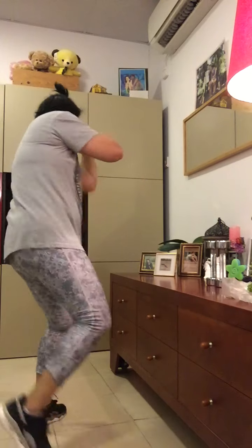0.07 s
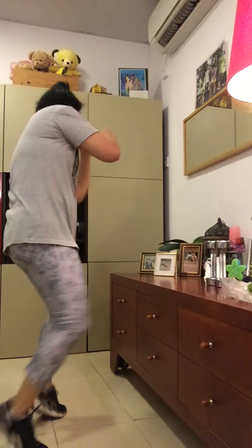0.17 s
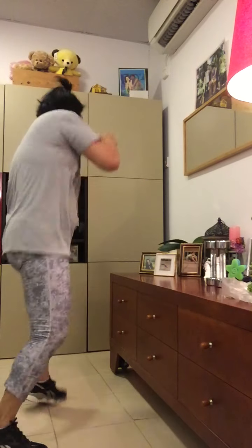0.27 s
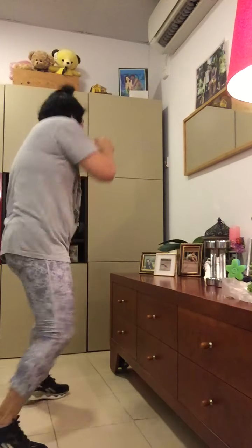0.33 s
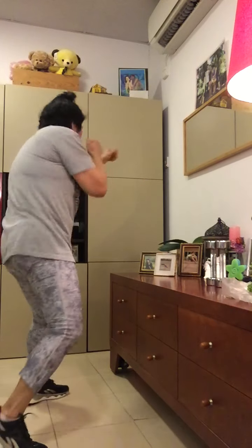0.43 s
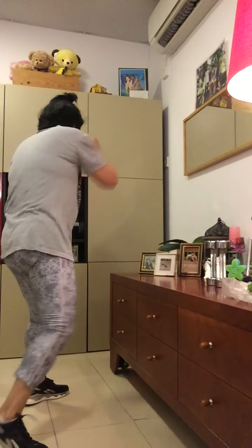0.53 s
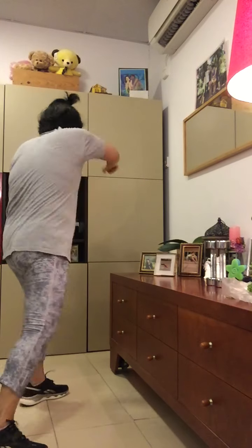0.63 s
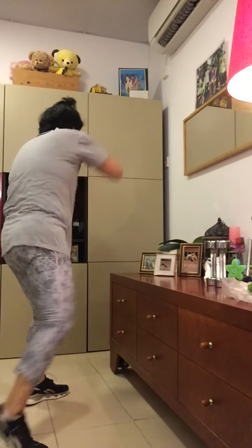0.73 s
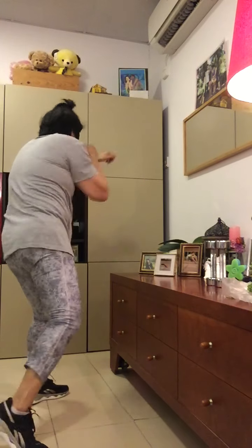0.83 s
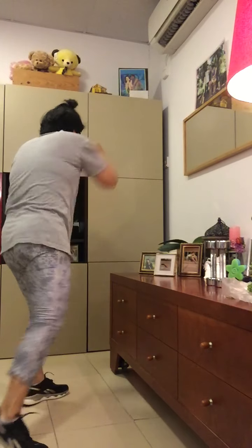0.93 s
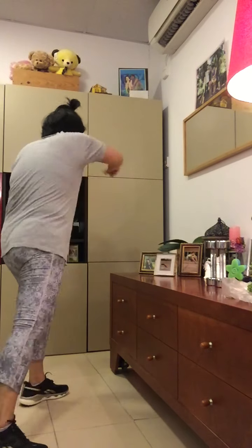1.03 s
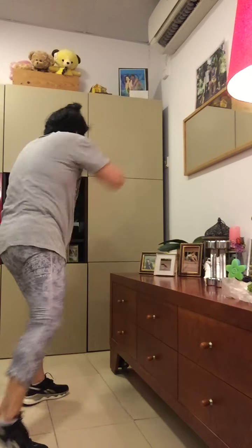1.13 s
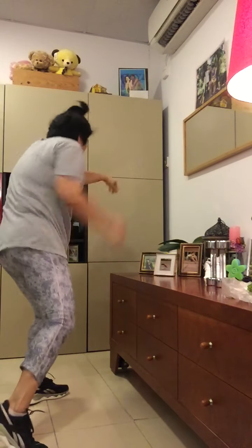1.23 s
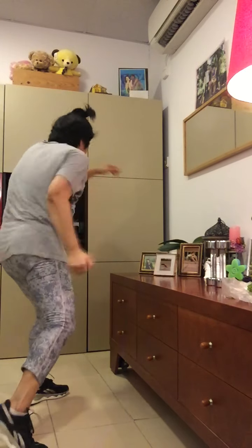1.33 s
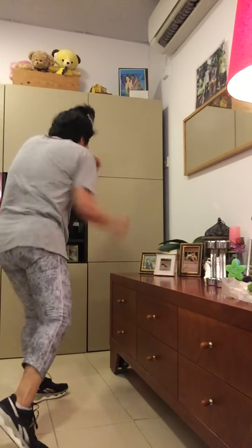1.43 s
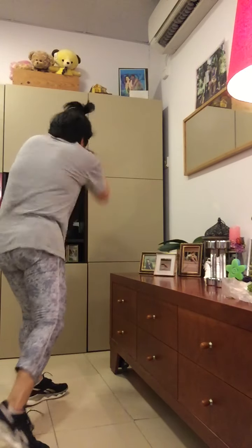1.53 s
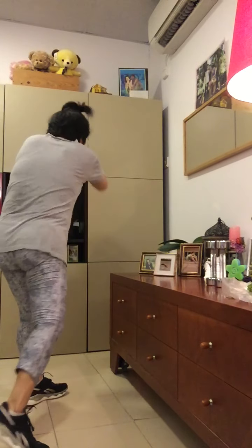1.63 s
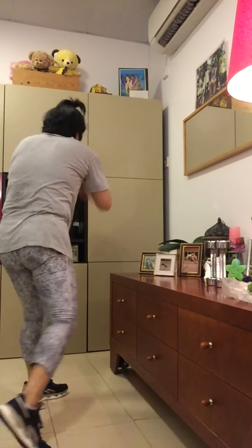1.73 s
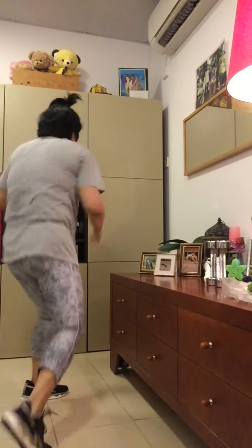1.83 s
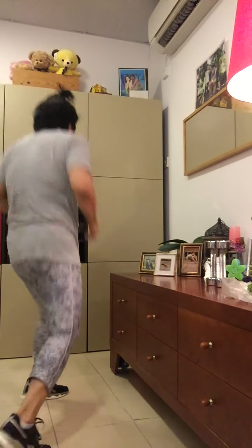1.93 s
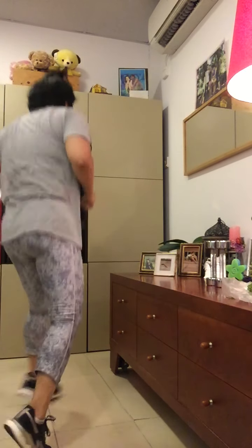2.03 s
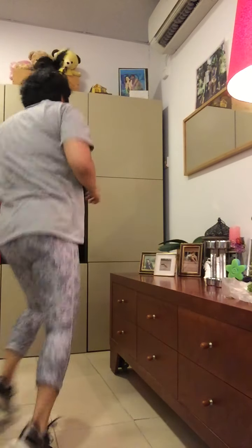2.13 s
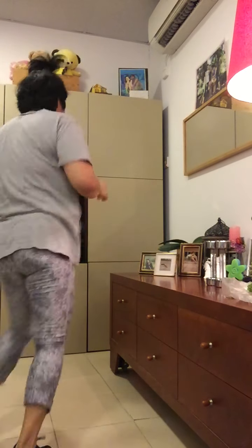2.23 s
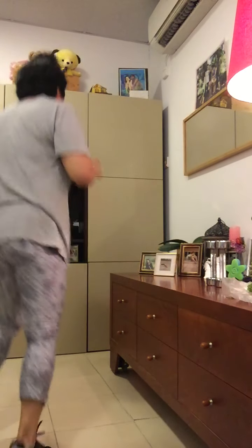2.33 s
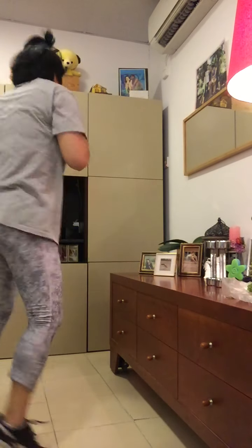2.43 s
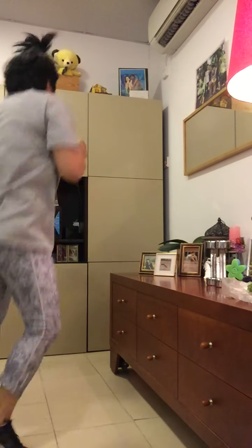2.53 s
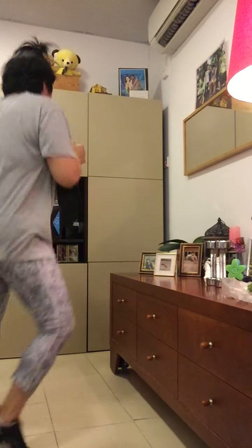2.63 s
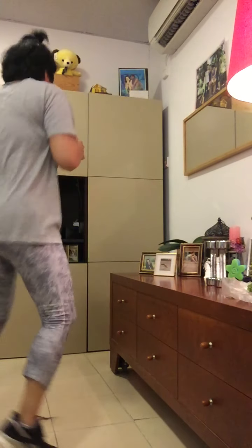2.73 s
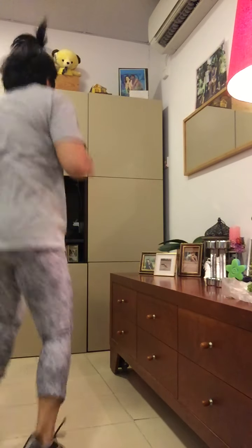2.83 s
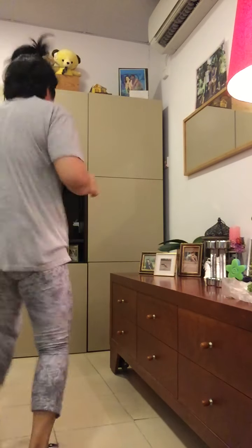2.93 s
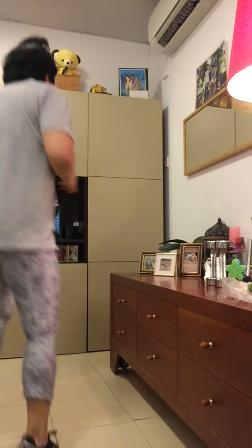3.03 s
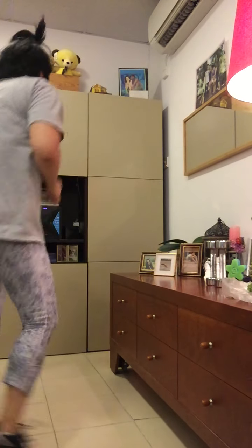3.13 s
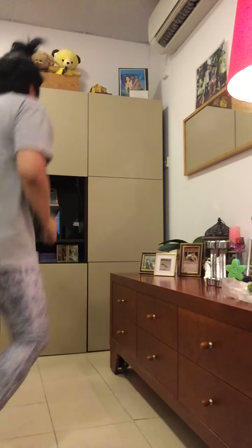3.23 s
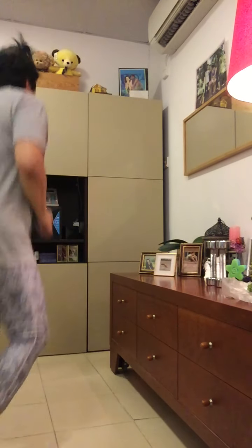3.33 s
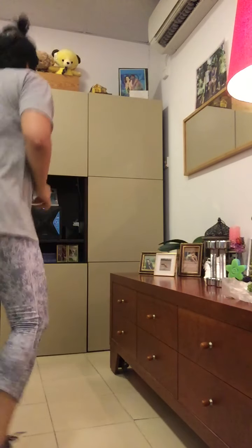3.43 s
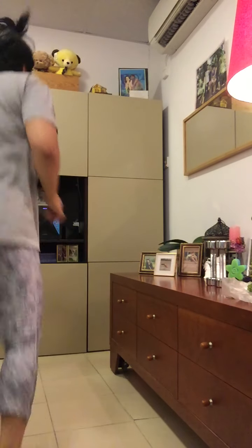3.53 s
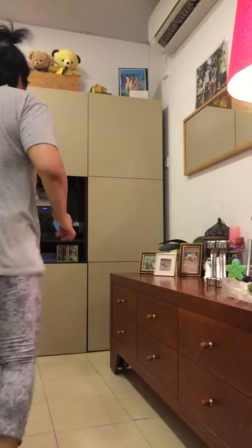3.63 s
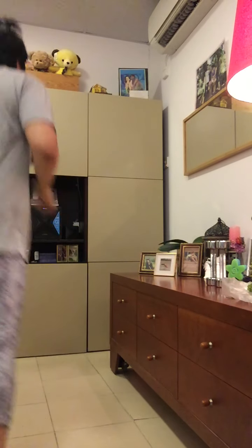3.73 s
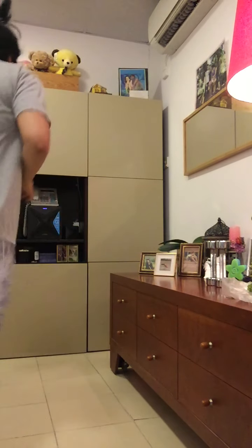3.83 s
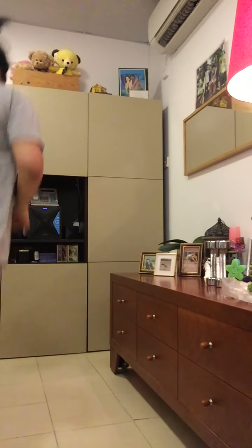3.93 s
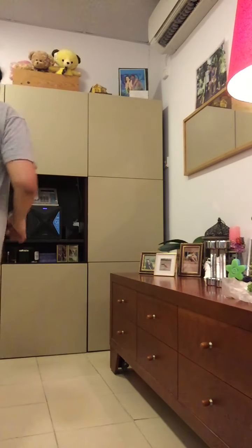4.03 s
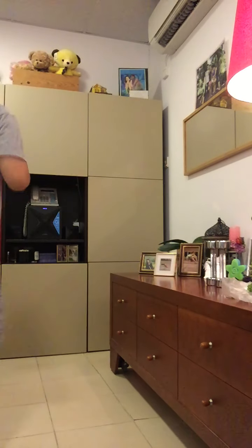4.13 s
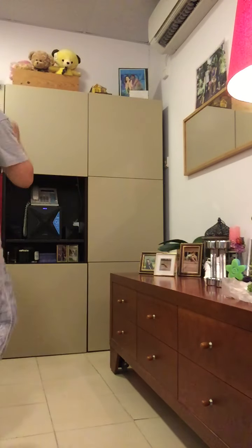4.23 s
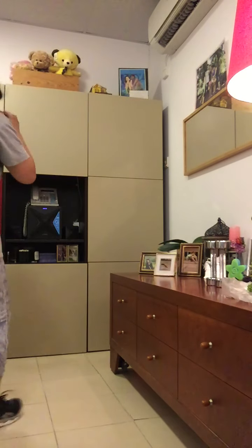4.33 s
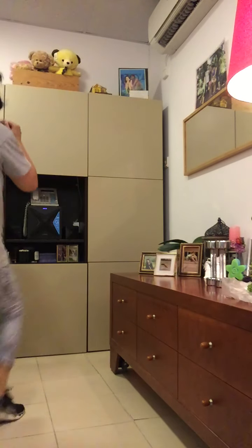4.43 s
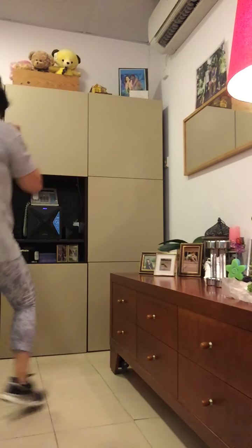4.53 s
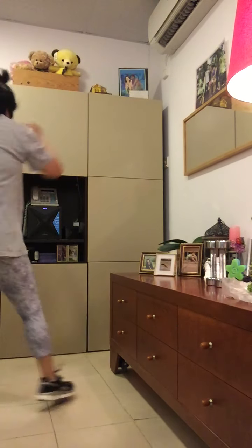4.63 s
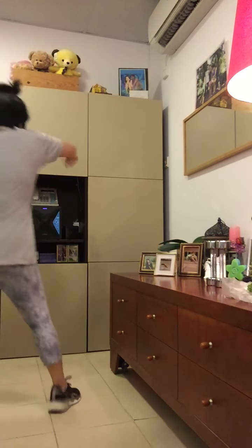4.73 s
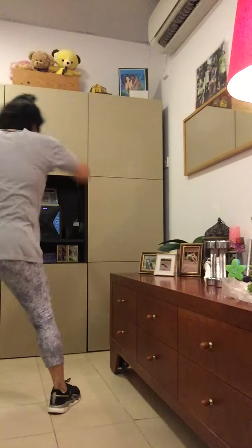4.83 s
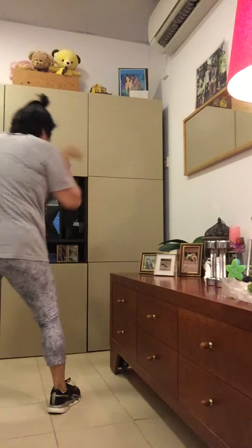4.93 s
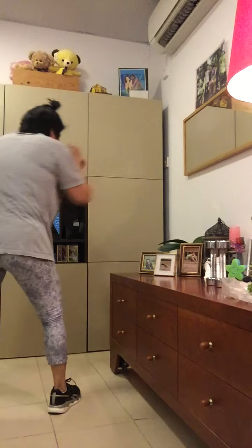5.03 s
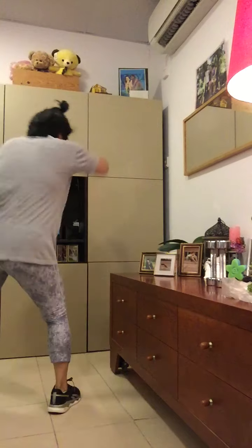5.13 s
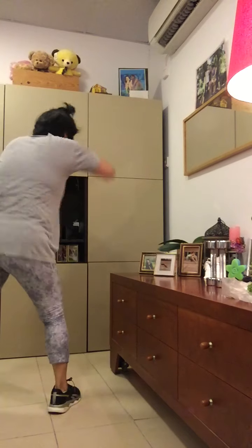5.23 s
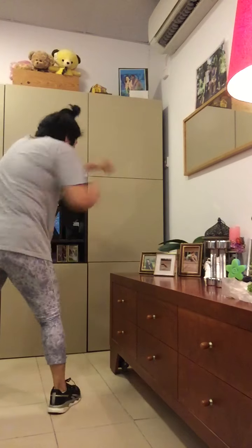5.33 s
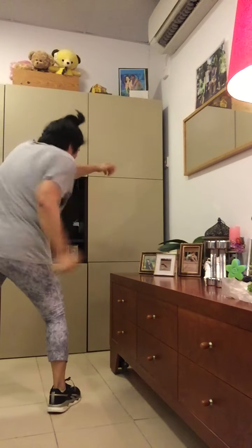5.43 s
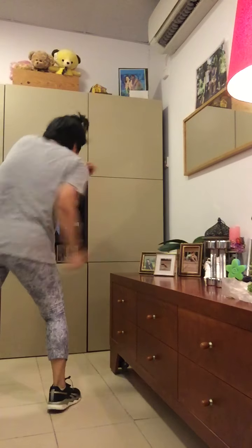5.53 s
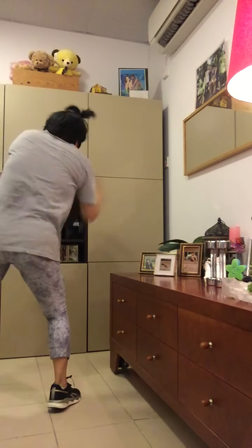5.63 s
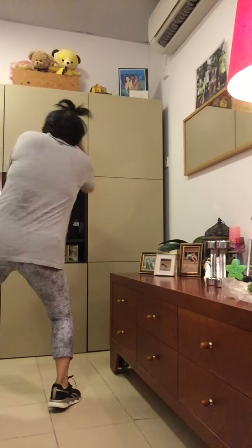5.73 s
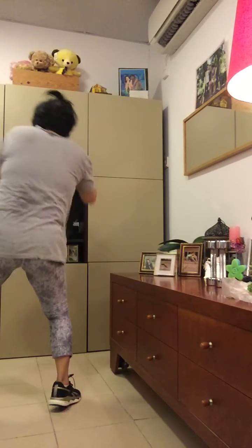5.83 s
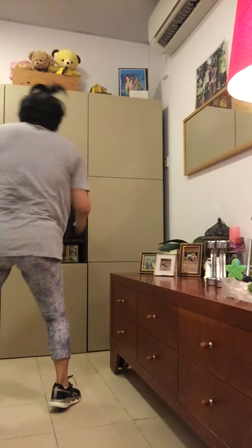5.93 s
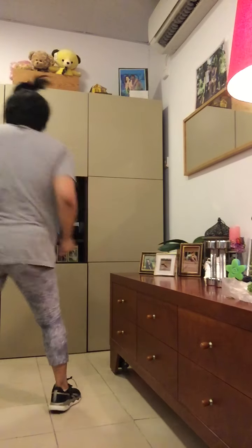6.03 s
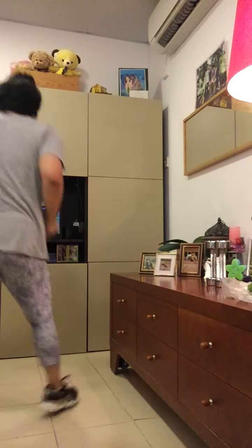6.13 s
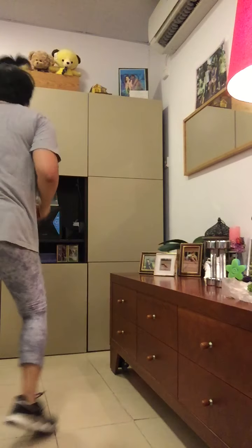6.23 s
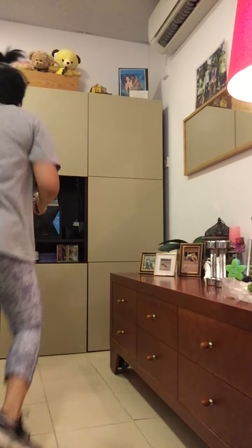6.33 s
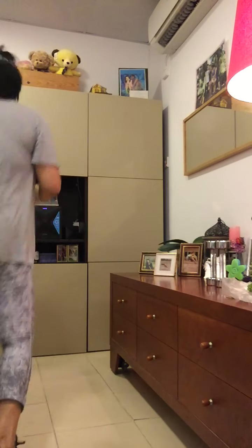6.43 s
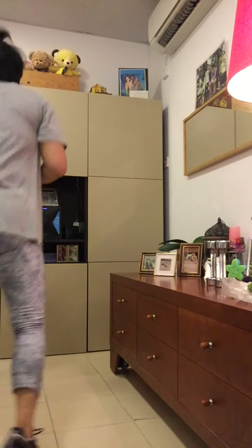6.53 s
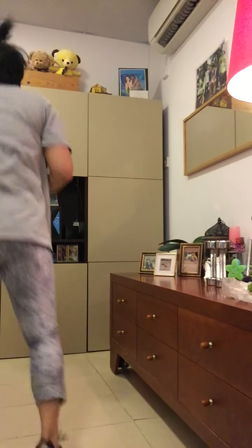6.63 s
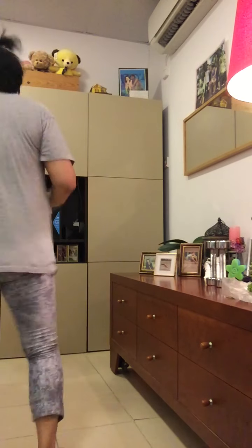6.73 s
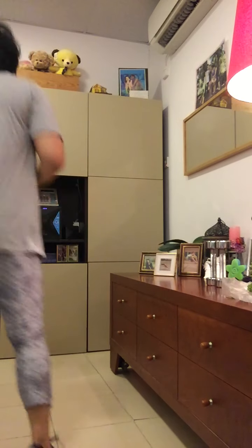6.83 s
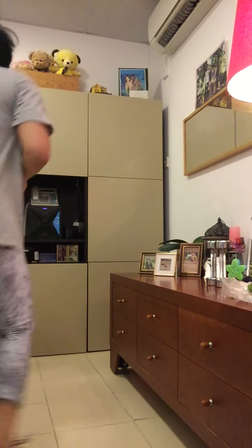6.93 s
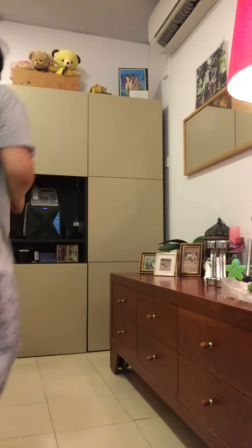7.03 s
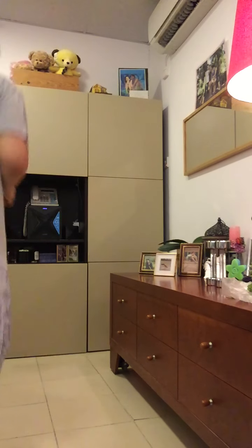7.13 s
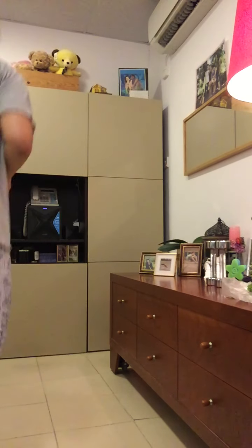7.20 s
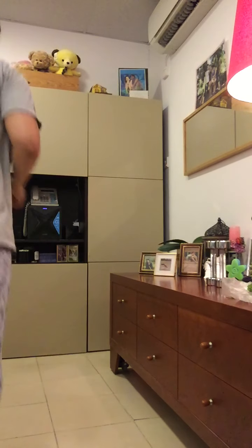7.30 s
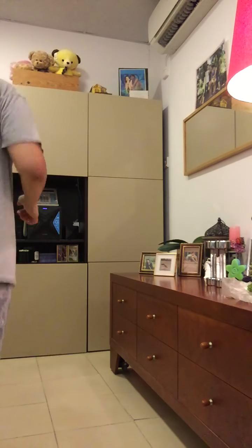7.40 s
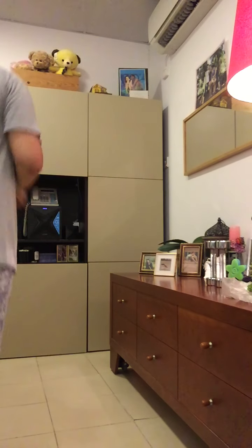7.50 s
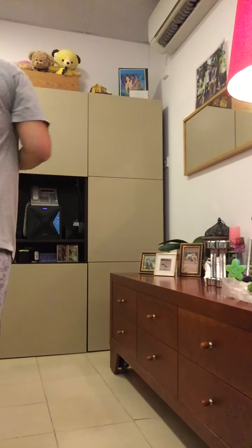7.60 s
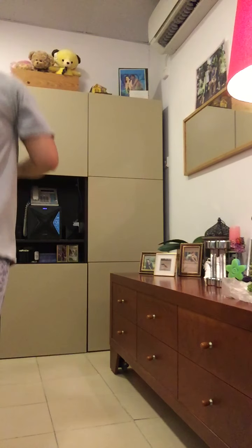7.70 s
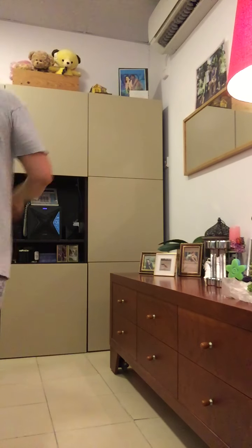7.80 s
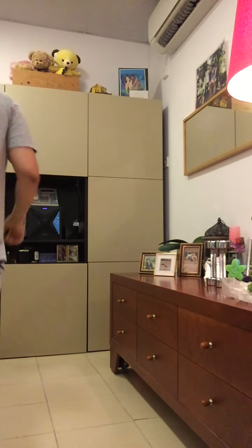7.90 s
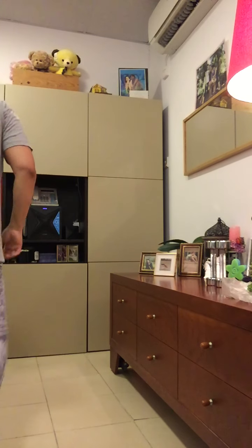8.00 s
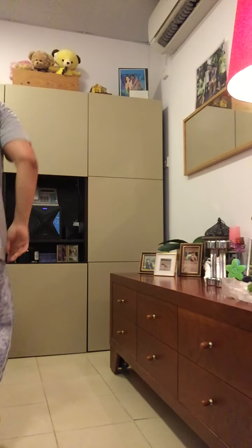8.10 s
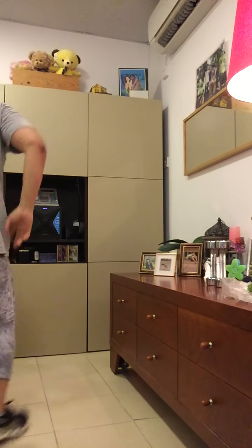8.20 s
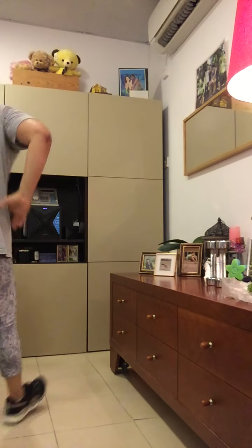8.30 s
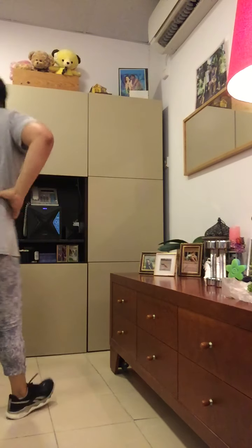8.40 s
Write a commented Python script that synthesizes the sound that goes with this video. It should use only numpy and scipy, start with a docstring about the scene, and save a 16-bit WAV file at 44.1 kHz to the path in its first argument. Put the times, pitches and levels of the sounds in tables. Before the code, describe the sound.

Someone exercises in rubber-soled shoes on hard tiles. Sparse sharp squeaks stand well above soft thuds, slaps, scuffs and tiny lace ticks, each with a short lively room echo. Activity is mostly between two and five seconds and again from six to eight, with low uneven rumble and faint hiss between. Single-channel pickup, moderately close, slight cloth rustle.

```python
"""Running shoes on a tiled floor

Rubber treads chirp by stick-slip oscillation as shoes step and pivot in a small, hard-walled room.
Heels and toes land as damped modes and filtered noise bursts; scuffs and lace ticks are shaped noise.
Clothes rustle faintly as slowly modulated noise, over a low, uneven rumble and a steady faint hiss.
Decaying noise serves as the room's response to the chirps, contacts, scuffs and ticks."""
import sys
import numpy as np
from scipy import signal
from scipy.fft import rfft, irfft, next_fast_len
from scipy.io import wavfile
from scipy.ndimage import uniform_filter1d, map_coordinates

SR = 44100
rng = np.random.default_rng(int(sys.argv[2]) if len(sys.argv) > 2 else 0)


def int16_out(signal):
    """Quantize to a 16-bit WAV file."""
    q = np.round(np.clip(np.atleast_2d(signal).T, -1, 1) * 32767)
    wavfile.write(sys.argv[1], SR, q.astype(np.int16))


N = 373086  # length of the scene in samples
T = np.arange(SR * 2 // 5) / SR  # time axis of one short event, 0.4 s
TOP_HZ = 15830  # upper limit of the audible band

# Noise spectrum of a soft rubbing surface, sole or fabric.
# Each row: frequency in Hz, density in dB per Hz (relative).
RUBBING = [(100, -30.5), (500, -3.5), (1200, 0), (2400, 0.5), (4000, -3), (6000, -11), (9000, -23),
           (16000, -30)]


def squeaks():
    """Stick-slip: a sliding tread sustains an oscillation whose pitch and strength follow its uneven grip."""
    # Tread chirps. Each row: time of full strength in s, sliding time in s, start and end pitch in Hz
    # before roughness, level of the loudest 20 ms in dB, 2nd and 3rd harmonic in dB against the 1st,
    # pitch roughness as a share, scrape in dB and skipped slips in dB.
    chirps = [ (0.036, 0.0056, 3230, 3070, -62, -15, -35, 0.088, -6, -9),
              (0.372, 0.011, 3400, 3240, -40, -39, -53, 0.0205, -36, -28),
              (0.376, 0.012, 4810, 4510, -38, -31, -53, 0.0068, -40, -36),
              (2.485, 0.021, 2522, 2677, -23, 1, -11.5, 0.029, -18.5, -21.5),
              (2.498, 0.017, 3040, 2687, -25, -7, -23.5, 0.036, -15, -16),
              (3.16, 0.0059, 3114, 2960, -39, -23.5, -52, 0.065, -21, -26),
              (3.177, 0.0049, 2780, 2860, -37.5, -21, -45, 0.03, -25, -30),
              (3.501, 0.0022, 3910, 3870, -55, -30, -55, 0.078, -2, -49),
              (3.511, 0.0061, 4300, 3750, -46.5, -41, -60, 0.091, -14, -38),
              (3.844, 0.021, 2610, 2577, -27, -12.5, -23.5, 0.042, -18, -19),
              (3.855, 0.016, 2430, 2330, -33.5, 3, -13.5, 0.028, -25, -26),
              (3.943, 0.026, 5900, 5640, -51, -40, -69, 0.013, -36, -30),
              (4.476, 0.0098, 3004, 3020, -28, 1.5, 7, 0.022, -16.5, -25.5),
              (4.479, 0.025, 3327, 3148, -34, -7.5, -29, 0.037, -18.5, -21.5),
              (6.65, 0.0036, 2730, 2560, -40.5, -18.5, -33, 0.0585, -24, -24),
              (6.9932, 0.0011, 2690, 2900, -39, -17.5, -44, 0.1, -28, -24),
              (7.008, 0.0011, 2904, 3050, -42, -20, -39.5, 0.054, -20.5, -21),
              (7.33, 0.0023, 2746, 2480, -35.5, -17.5, -31, 0.033, -18.5, -13),
              (7.339, 0.006, 2744, 2750, -34.5, -15, -32, 0.035, -27, -20)]
    # 4th and 5th harmonic, each in dB against the 3rd.
    upper_db = [-14, -16]
    # Noise spectrum of a scraping tread. Each row: frequency in Hz, density in dB per Hz (relative).
    scrape_spectrum = [(200, -24), (1400, -7.5), (2200, 3.5), (3500, 7.5), (6000, -2.5), (9000, -16.5),
                       (16000, -22)]
    # louder chirps start more abruptly
    reference_db = -28.5  # chirp level that has the plain onset time
    onset_s, onset_halves_db = 0.0016, 15.5  # onset time; extra level that halves it
    let_go_s = .0013  # decay time once the tread grips
    # faint noise rising into the chirp: level against the full scrape, rise time
    lead_in_db, lead_in_s = -10, 0.014
    flutter_db, rough_flutter_db = 1.8, 25  # unsteady strength: smooth chirp, extra per share of roughness
    before_s = .04  # time kept ahead of full strength
    out = np.zeros(N)
    t = T - before_s
    for s, length, start_hz, end_hz, db, second_db, third_db, rough, scrape_db, skip_db in chirps:
        extra_db = db - reference_db
        rise_s = onset_s * .5 ** (extra_db / onset_halves_db)
        grip = wobble(500, len(T)) + .45 * wobble(1300, len(T))
        pitch = np.interp(t, [0, length], [start_hz, end_hz]) * (1 + rough * grip)
        phase = 2 * np.pi * np.cumsum(pitch) / SR
        levels = [0, second_db, third_db, *(third_db + np.array(upper_db))]
        tone = tread_tone(phase, start_hz, levels, rough)
        # a poor grip scrapes, and makes every other slip weaker: a partial between the first two harmonics
        scrape = amp(scrape_db) * unit(colour(rng.standard_normal(len(T)), scrape_spectrum))
        skips = amp(skip_db) * wobble(700, len(T)) * np.sin(phase + phase / 2)
        # the chirp rises exponentially, holds while the tread slides and stops when it grips
        onset = np.exp(np.minimum(t, 0) / rise_s)
        lead_in = amp(lead_in_db) * np.exp(np.minimum(t, 0) / lead_in_s)
        sliding = np.exp(-np.maximum(t - length, 0) / let_go_s)
        flutter = amp((flutter_db + rough_flutter_db * rough) * wobble(452.5, len(T)))
        source = (unit(tone) + skips) * onset + scrape * np.maximum(onset, lead_in)
        chirp = source * sliding * flutter
        add(out, s - before_s, at_level(room(chirp, wet_db=-2.5), db))
    return out


def tread_tone(phase, start_hz, levels, rough):
    """Phase incoherence: neighbouring tread blocks slip out of step and blur each harmonic into a band."""
    blur_share = 6  # blur per share of roughness
    skirt_share = .3  # fast part of the blur, which widens each partial

    def blur():
        return rough * blur_share * (wobble(750, len(T)) + skirt_share * wobble(2000, len(T)))

    tone = 0
    for k, level in enumerate(levels, 1):
        if k * start_hz < SR / 2:
            partial = (1 + blur()) * np.sin(k * phase) + blur() * np.cos(k * phase)
            tone = tone + amp(level) * partial
    return tone


def steps(thud_db=6.0, slap_db=1, snap_db=6.5):
    """Impact excitation: the shoe's body thuds, the sole slaps and the tread edge snaps."""
    # Heel and toe contacts. Each row: start in s; thud, slap and snap in dB, before the offset of each
    # part and the standing waves; thud, slap and snap frequency in Hz; time to settle in s.
    contacts = [ (0.248, -51.5, -55.5, -65.5, 648, 1220, 3940, 0.00094),
                (.275, -65, -66, -58, 560, 1360, 3430, 0.0014),
                (1.953, -73, -58.5, -78, 544, 1876, 3070, 0.0014),
                (2.286, -63, -60, -66.5, 560, 1700, 3300, 0.0026),
                (2.554, -56, -54.5, -55, 547, 1790, 3820, 0.003),
                (2.876, -49, -46.5, -46.5, 523, 1540, 3200, 0.00099),
                (2.939, -54.5, -55, -62, 403, 1710, 2870, 0.00092),
                (3.078, -84, -63, -72, 845, 1420, 3600, 0.0012),
                (3.234, -48.5, -48, -57.5, 692, 1090, 4080, 0.00047),
                (3.302, -72, -63, -64, 495, 1710, 3670, 0.0095),
                (3.586, -52, -52, -61.5, 318, 1630, 3150, 0.0016),
                (3.657, -55, -59.5, -56.5, 390, 1610, 4100, 0.00029),
                (3.95, -60.5, -53.5, -58, 830, 1560, 4200, 0.00098),
                (4.066, -59.5, -60.5, -68.5, 572, 1220, 3520, 0.0034),
                (4.476, -56.5, -52, -65.5, 723, 1700, 3220, 0.0018),
                (4.813, -54.5, -49.5, -58.5, 608, 1870, 3520, 0.0033),
                (4.877, -56, -53, -53, 514, 2170, 3450, 0.0015),
                (5.530, -63, -63, -69.5, 389.5, 1655, 3550, 0.015),
                (6.072, -53.5, -59, -75.5, 474, 1022, 3950, 0.0019),
                (6.094, -70, -58, -68, 520, 2110, 4000, 0.0029),
                (6.204, -72, -61, -60, 550, 2400, 3000, 0.004),
                (6.211, -61, -56.5, -59.5, 547, 2600, 3940, 0.0011),
                (6.478, -60, -56.5, -56.5, 330, 1790, 3060, 0.0019),
                (6.716, -57, -47, -54.5, 625, 1670, 3080, 0.00054),
                (6.789, -52.5, -54.5, -52.5, 440, 1930, 3640, 0.001),
                (7.054, -58.5, -52.5, -57, 461, 2220, 4000, 0.0022),
                (7.141, -60, -61, -59.5, 373, 2170, 3250, 0.0012),
                (7.444, -53, -56, -55, 411, 1910, 4180, 0.0013),
                (7.84, -68.5, -65.5, -65, 597, 1432, 3700, 0.0019),
                (7.882, -65.5, -65.5, -74.5, 796, 1130, 3060, 0.0041)]
    # Slap of the sole. Each row: frequency over the contact's slap frequency, density in dB per Hz (relative).
    slap_shape = [(.12, -21), (.4, -10.5), (.75, -2), (1.1, -4), (1.6, -9.5), (2.3, -17), (5, -45)]
    # Snap of the tread edge. Each row: frequency over the contact's snap frequency,
    # density in dB per Hz (relative).
    snap_shape = [(.3, -28.5), (0.699, -5), (.9, 2.5), (1.072, 5), (1.301, -8.5), (1.7, -12), (2.2, -23.5),
                  (4.002, -41.5)]
    # Standing waves between floor and furniture, colouring every footfall.
    # Each row: frequency in Hz, gain in dB.
    standing_waves = [(330, 0), (430, 2.5), (540, -5), (650, 4.5), (800, 0.5), (2700, 3.5), (3600, -0.5),
                      (4400, 0)]
    out = np.zeros(N)
    for s, thud, slap, snap, thud_hz, slap_hz, snap_hz, settle in contacts:
        body = knock(thud_hz) * (1 - np.exp(-T / settle))
        sole = echoed(impact(settle, slap_shape, slap_hz))
        edge = echoed(impact(settle, snap_shape, snap_hz))
        add(out, s, at_level(room(body, wet_db=-2.0), thud + thud_db))
        add(out, s, at_level(room(sole, wet_db=4), slap + slap_db))
        add(out, s, at_level(room(edge, wet_db=-2), snap + snap_db))
    return colour(out, standing_waves)


def knock(hz, detune=0.062):
    """Modal superposition: the hollow shoe rings in damped modes, shifted by how the foot loads it."""
    # Modes of the shoe. Each row: frequency over the thud's, before detuning;
    # mean level in dB; time to lose 60 dB in s.
    modes = [(0.42, -13, .04), (0.739, -4, 0.03), (0.999, -2, 0.038), (1.4, -9.5, 0.035),
             (2.001, -8, 0.021)]
    load_db = 3  # how much each mode's strength differs from step to step
    chance = rng.standard_normal((len(modes), 2))
    out = np.zeros(len(T))
    for k, ((ratio, db, t60), (load, shift)) in enumerate(zip(modes, chance)):
        mode_hz = hz * ratio * (1 + detune * shift)
        ring = fade(T, t60) * np.sin(2 * np.pi * mode_hz * T)
        out += (-1) ** k * amp(db + load_db * load) * ring  # neighbouring modes alternate in sign
    return out


def impact(settle, shape, centre_hz):
    """Source and filter: tread blocks meet the tile in turn, a gritty burst through the bent sole's resonances."""
    grit_db = 5  # unevenness of the tread blocks
    release_s, release_growth = .0015, 1.4  # shortest release, and its growth per second of settling
    press = (1 - np.exp(-(2 * T / settle) ** 2)) * np.exp(-T / (release_s + release_growth * settle))
    grit = rng.standard_normal(len(T)) * amp(grit_db * wobble(1200, len(T)))
    return colour(grit * press, rippled(np.array(shape) * [centre_hz, 1]))


def echoed(x):
    """Specular reflection: the cabinet fronts return one clear echo, its delay varying between contacts."""
    echo_s, spread_s, echo_db = .009, .001, -7  # mean delay, its random spread, level
    out = x.copy()
    add(out, echo_s + spread_s * rng.standard_normal(), amp(echo_db) * x)
    return out


def rippled(spectrum):
    """Bending resonance: the sole bends differently each time and lays new peaks and dips over a spectrum."""
    ripple_db = 3.2  # depth of the resonances
    hz = np.geomspace(100, TOP_HZ, 56)
    return np.column_stack([hz, along(spectrum, hz) + ripple_db * rng.standard_normal(len(hz))])


def scuffs(grain_db=4):
    """Sliding friction: a sole that slides without gripping makes a short, grainy noise."""
    # Soles brushing the tiles. Each row: start in s, level of the loudest 20 ms in dB.
    brushes = [(.388, -55.5), (2.078, -50.5), (2.225, -62.5), (2.39, -57), (3.412, -59), (3.771, -56.5),
               (4.184, -58), (6.625, -58), (6.866, -57), (6.961, -60), (7.575, -62.5)]
    out = np.zeros(N)
    for s, db in brushes:
        grains = rng.standard_normal(len(T)) * amp(grain_db * wobble(560, len(T)))
        pressure = stroke(length=.02, rise=.014, fall=.013)  # s
        brush = colour(grains * pressure, rippled(RUBBING))
        add(out, s, at_level(room(brush, wet_db=-4.0), db))
    return out


def stroke(length, rise, fall):
    """Friction follows pressure: on a sliding sole it builds, holds for the length and lets go."""
    return (1 - np.exp(-T / rise)) * np.exp(-np.maximum(T - length, 0) / fall)


def laces():
    """Impulsive contact: hard lace tips flick against the shoes as brief coloured noise."""
    # Lace ticks. Each row: start in s, level of the loudest 20 ms in dB.
    flicks = [(0.276, -62), (0.373, -49.5), (.535, -56), (.799, -64.5), (2.194, -67.5), (2.946, -64),
              (3.329, -65.5), (4.074, -67.5), (6.214, -57.5), (6.879, -62), (7.58, -64), (7.846, -61.5),
              (8.407, -67)]
    # Noise spectrum of a lace tip. Each row: frequency in Hz, density in dB per Hz (relative).
    tip_spectrum = [(500, -4.5), (2500, 5), (4500, 1.5), (7000, 0.5), (10000, -9.5), (16000, -16.5)]
    out = np.zeros(N)
    for s, db in flicks:
        tick = colour(burst(0.0041), tip_spectrum)
        add(out, s, at_level(room(tick, wet_db=2.5), db))
    return out


def burst(decay):
    """Energy dissipation: the noise of a contact dies exponentially with this time constant."""
    return rng.standard_normal(len(T)) * np.exp(-T / decay)


def clothes(grain_db=3):
    """Amplitude modulation: rubbing fabric swells and fades with each turn of the body."""
    # Turns of the body. Each row: middle in s, length in s, peak level in dB before the grain.
    turns = [(2.642, 1, -66.5), (6.91, 0.83, -63.5)]
    t = np.arange(N) / SR
    motion = sum(amp(db) * np.exp(-(2 * (t - s) / length) ** 2) for s, length, db in turns)
    fabric = unit(colour(rng.standard_normal(N), RUBBING))
    return fabric * motion * amp(grain_db * wobble(30, N))


def background(rumble_db=2, swell_db=2):
    """Stationary and fluctuating noise: an unevenly swelling rumble and a faint even hiss."""
    # Course of the rumble. Each row: time in s, level in dB before the offset and the swelling.
    rumble_course = [(0.0, -60.5), (0.35, -60.5), (0.75, -66), (1.11, -59), (1.58, -62), (2.92, -57),
                     (3.23, -61), (3.91, -58), (4.069, -62), (4.849, -58.5), (5.09, -65), (5.54, -61),
                     (5.73, -63), (6.55, -62.5), (6.97, -59.5), (7.28, -64), (8.46, -65.5)]
    # Spectrum of the rumble. Each row: frequency in Hz, density in dB per Hz (relative).
    rumble_spectrum = [(25, -42.5), (32, -29), (39, -12.5), (48, 3.5), (62, -6), (80, -7.5), (105, -11),
                       (155, -5.5), (230, -14), (340, -17.5), (440, -20.5), (560, -49.5), (1100, -63.5)]
    # Spectrum of the hiss. Each row: frequency in Hz, density in dB per Hz (relative).
    hiss_spectrum = [(300, -10), (650, 0), (1000, -2.5), (1600, -2.5), (2500, -5.5), (5000, -10.5),
                     (8000, -14.5), (12000, -19.5), (15500, -21)]
    hiss_db = -72.5
    course_db = np.interp(np.arange(N) / SR, *np.transpose(rumble_course))
    level_db = course_db + rumble_db + swell_db * wobble(13.0, N)
    rumble = unit(colour(patchy_noise(), rumble_spectrum)) * amp(level_db)
    hiss = unit(colour(rng.standard_normal(N), hiss_spectrum)) * amp(hiss_db)
    return rumble + hiss


def patchy_noise():
    """Independent band modulation: neighbouring parts of the noise spectrum swell and sink separately."""
    patch_db = 2.5  # depth of the patches
    z = signal.stft(rng.standard_normal(N), nperseg=2048)[2]
    field = uniform_filter1d(rng.standard_normal(z.shape), size=3, axis=0)  # across frequency
    field = uniform_filter1d(field, size=5, axis=1)  # across time
    return signal.istft(z * amp(patch_db * unit(field)), nperseg=2048)[1][:N]


def room(x, wet_db, build=0.0054, early=0.0022, lumpy_db=6, near_db=3):
    """Reverberation: strong early echoes blur into a decaying tail, new for every sound, added to the direct."""
    # Absorption of the walls. Each row: frequency in Hz, time to lose 60 dB in s.
    reverb_times = [(150, .45), (400, .4), (900, .34), (2800, .31), (5500, .32), (9000, .26), (15000, .21)]
    hz, t, z = signal.stft(rng.standard_normal(len(T)), SR, nperseg=256)
    tail = signal.istft(z * fade(t, along(reverb_times, hz)[:, None]), SR, nperseg=256)[1][:len(T)]
    onset = 1 - np.exp(-(T / build) ** 2)
    early_db = (near_db + lumpy_db * wobble(900, len(T))) * np.exp(-T / early)
    tail *= onset * amp(early_db)
    return x + amp(wet_db) * signal.fftconvolve(x, tail / np.linalg.norm(tail))[:len(x)]


def fade(t, t60):
    """Exponential decay: gain of a ring that loses 60 dB in t60 seconds."""
    return amp(-60 * t / t60)


def colour(x, spectrum):
    """Minimum-phase filtering: folding the cepstrum gives a causal filter with the spectrum as its gain."""
    m = 2 * next_fast_len(len(x) // 2 + SR // 10)
    cepstrum = irfft(np.log(amp(along(spectrum, np.fft.rfftfreq(m, 1 / SR)))))
    cepstrum[1:m // 2] *= 2
    cepstrum[m // 2 + 1:] = 0
    return irfft(rfft(x, m) * np.exp(rfft(cepstrum)))[:len(x)]


def along(points, hz):
    """Logarithmic frequency scale: read (Hz, value) points between their knots."""
    f, v = np.transpose(points)
    return np.interp(np.log(hz + 1), np.log(f), v)


def wobble(rate, size):
    """Band-limited fluctuation: a smooth random curve with rate knots a second."""
    knots = rng.standard_normal(int(size * rate / SR) + 4)
    return map_coordinates(knots, [np.arange(size) * rate / SR])


def amp(db):
    """Logarithmic level: decibels to amplitude gain."""
    return 10 ** (np.asarray(db) / 20)


def unit(x):
    """Root mean square: scale a signal to rms 1."""
    return x / np.sqrt(np.mean(x ** 2) + 1e-20)


def at_level(x, db):
    """Short-time level: scale a sound so that its loudest 20 ms have this rms level."""
    return x * amp(db) / np.sqrt(uniform_filter1d(x ** 2, size=SR // 50).max())


def add(track, s, sound):
    """Linear superposition: mix a sound into the track at time s."""
    start = max(round(s * SR), 0)
    part = track[start:start + len(sound)]
    part += sound[:len(part)]


def scene():
    """Superposition: the pressures of shoes, clothes and room sum in one channel."""
    return (squeaks() + steps() + scuffs() + laces() + clothes() + background())[None]


def record(dry):
    """Band limitation: every component at or above the top frequency is removed."""
    m = next_fast_len(N + SR // 2)
    passed = np.fft.rfftfreq(m, 1 / SR) < TOP_HZ
    return irfft(rfft(dry, m) * passed, m)[..., :N]


dry = scene()
out = record(dry)
int16_out(out)
```